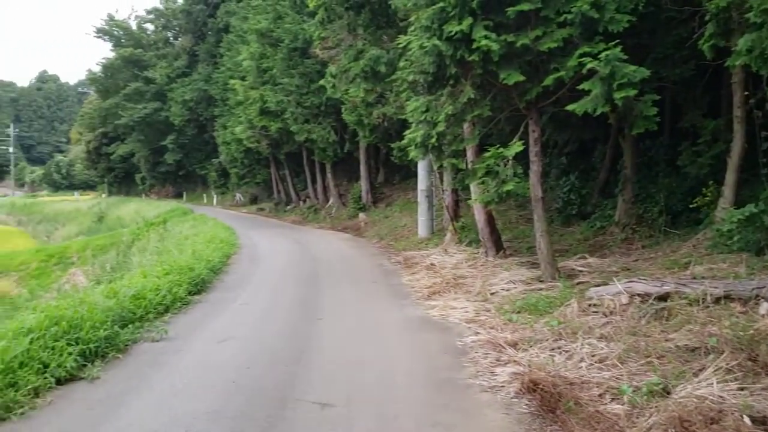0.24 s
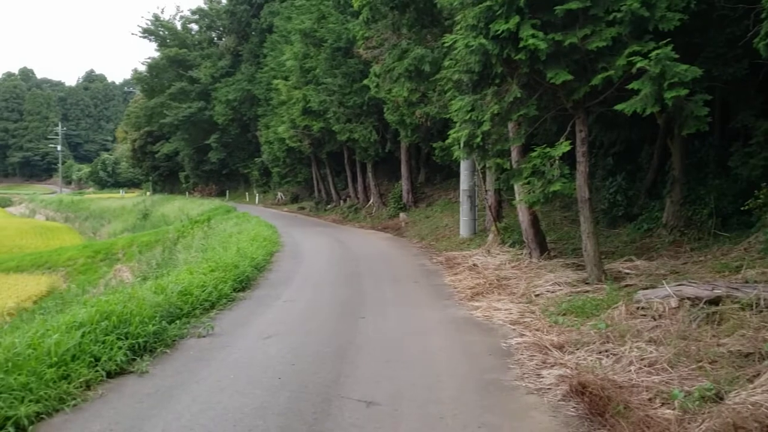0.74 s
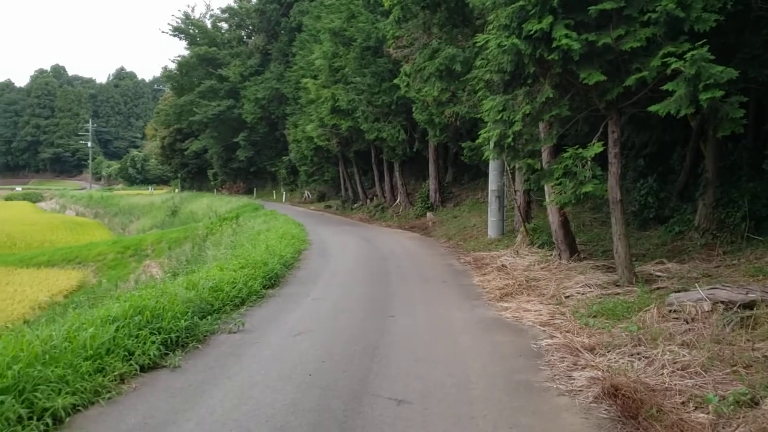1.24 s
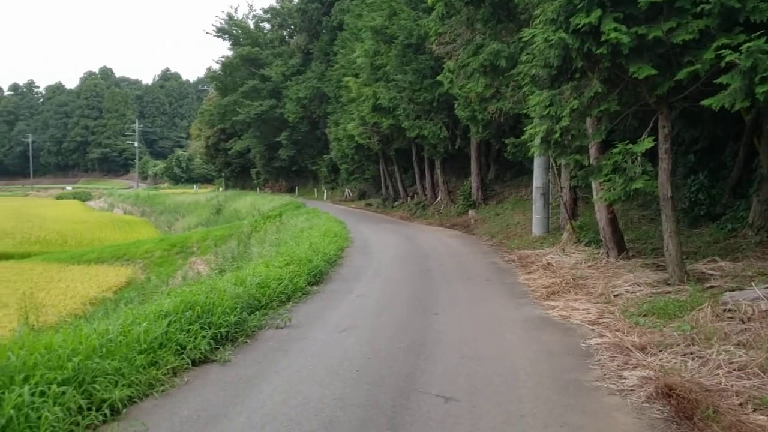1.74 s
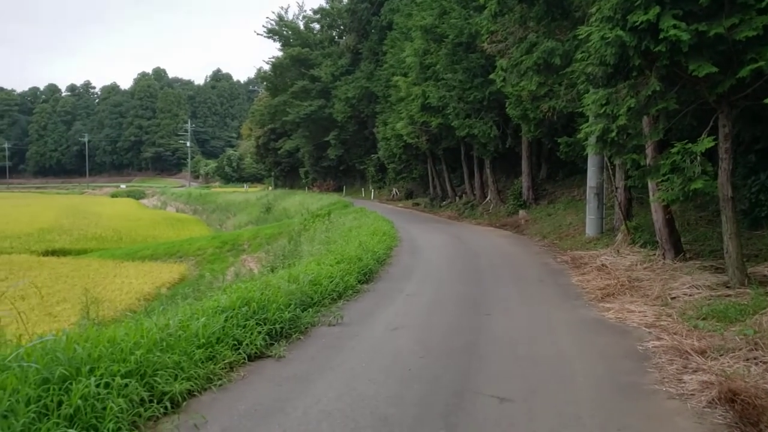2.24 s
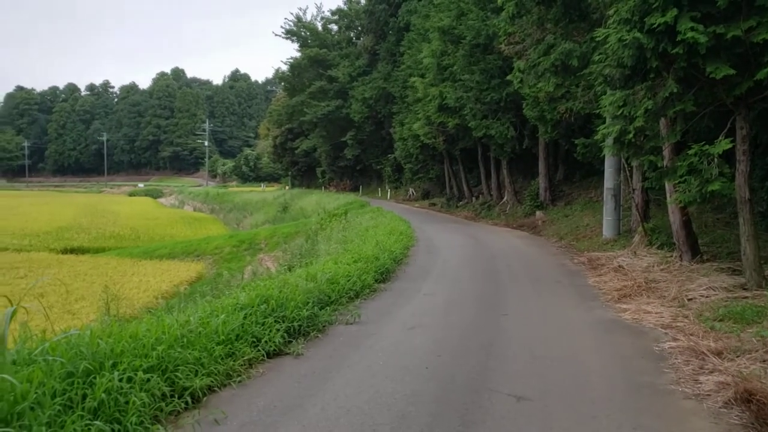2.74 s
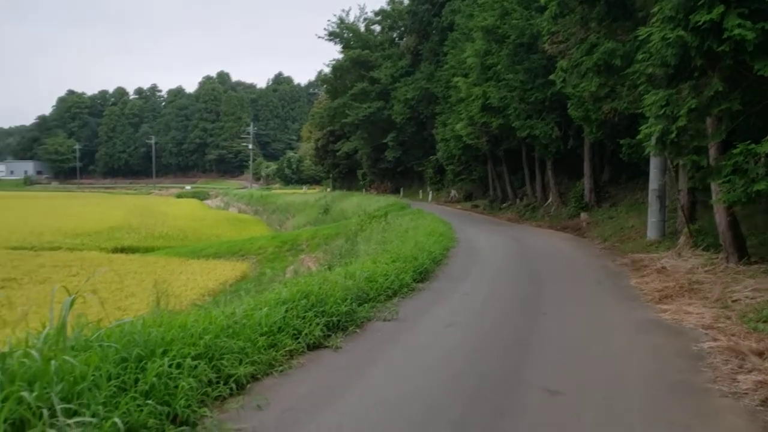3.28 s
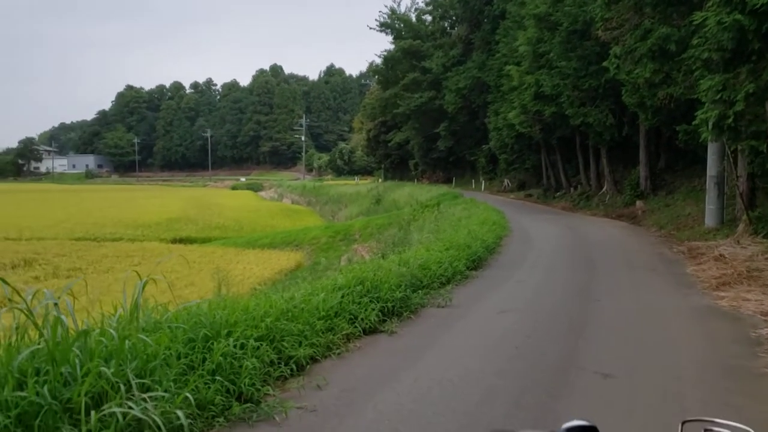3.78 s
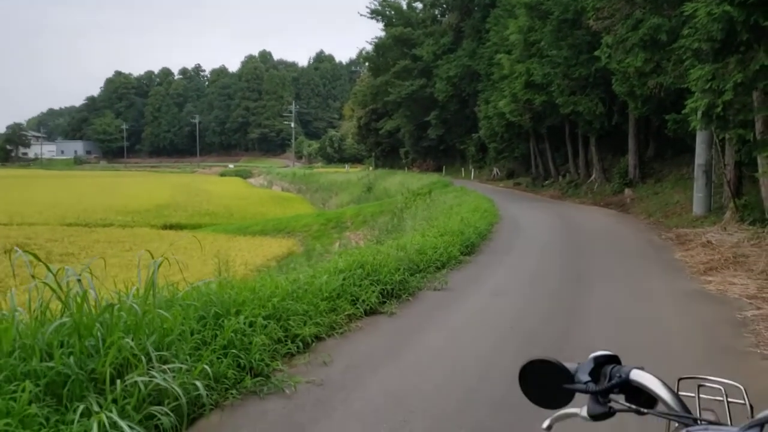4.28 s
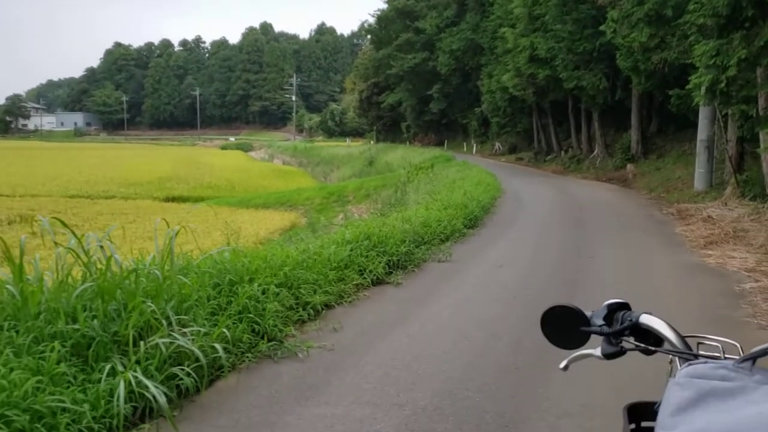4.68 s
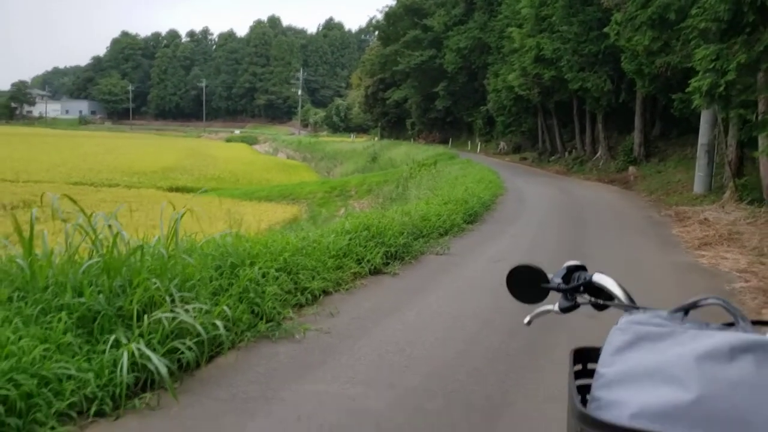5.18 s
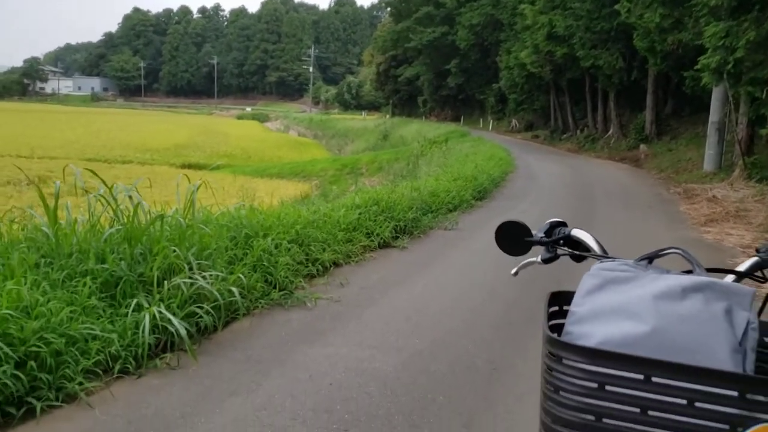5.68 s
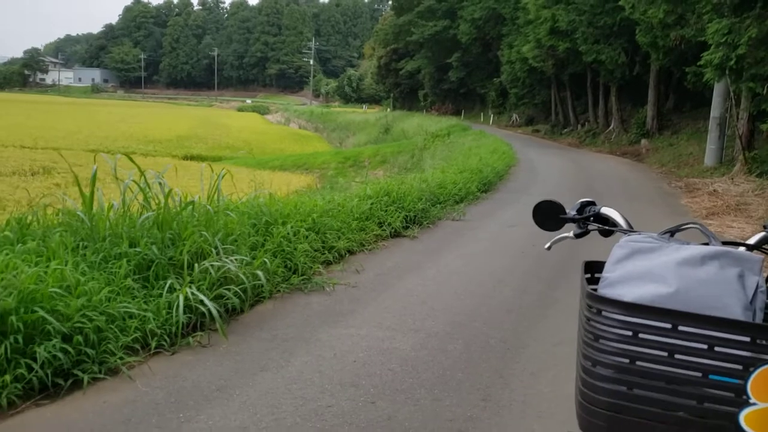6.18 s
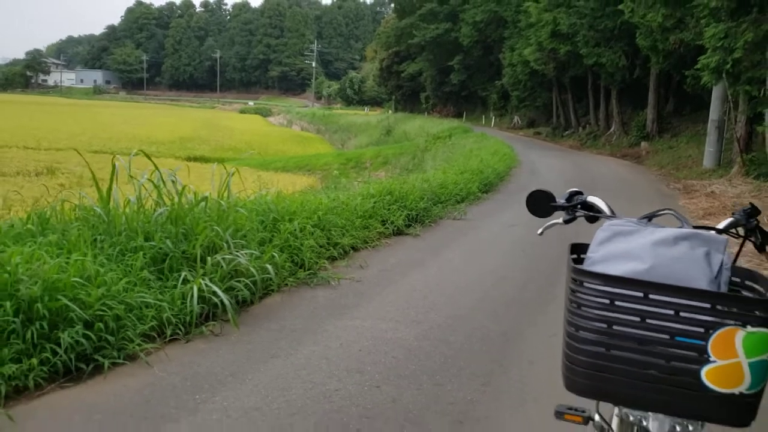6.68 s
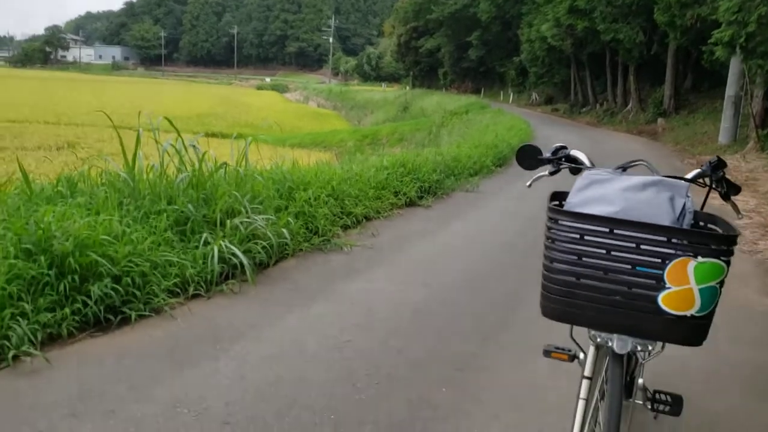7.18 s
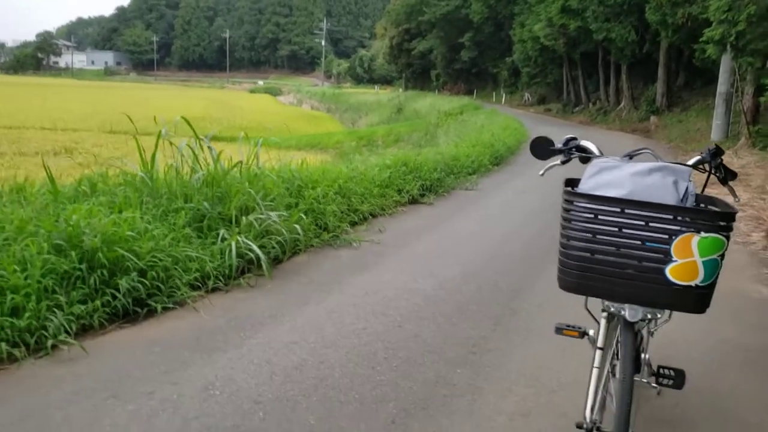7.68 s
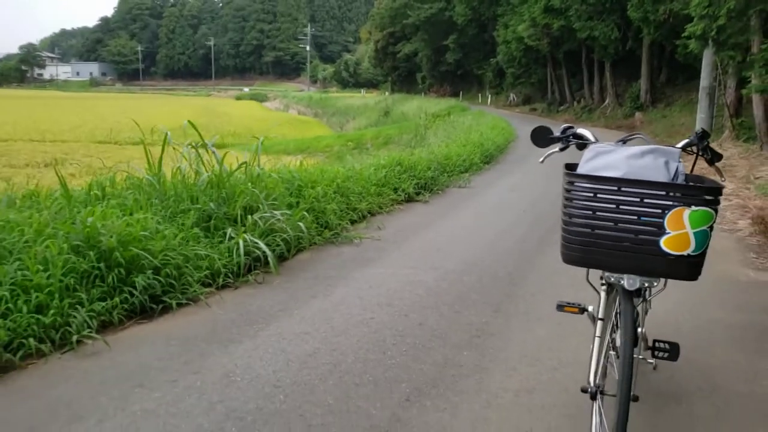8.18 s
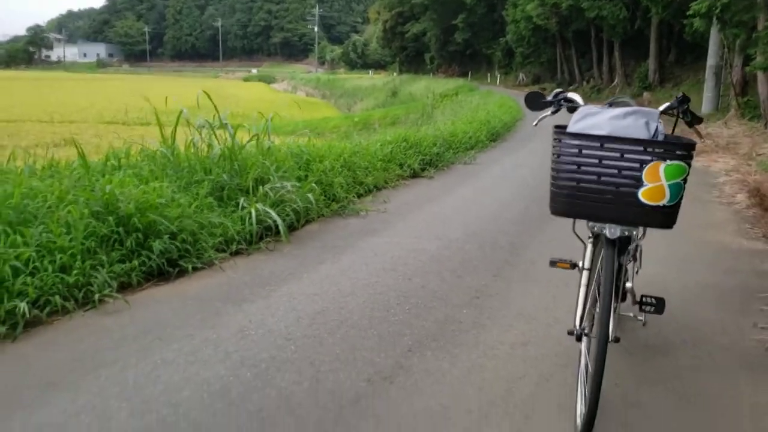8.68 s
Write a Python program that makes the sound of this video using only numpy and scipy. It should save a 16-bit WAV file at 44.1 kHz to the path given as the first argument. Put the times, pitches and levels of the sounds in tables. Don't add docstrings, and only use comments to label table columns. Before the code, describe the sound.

A handheld stereo phone hears a lane beside an echoing wood. Steady insect hiss and a soft, far cicada chorus run throughout; the chorus swells around 1.6 s, sinks near 5.7 and returns by 6.7. An early cicada pulses from 0 to 1.3 s. At 0.9 a near one starts, rapid ringing notes with sharp attacks, about eight or nine a second, rising in pitch, then sagging and slowing until 7.5. At 5.7 a second singer warms up and bursts in loudest from 6.1, joined by a third at 6.6 and fourth at 6.8, overlapping to the end at 8.9. Low wind rumble rises after 0.5, strengthens at 6, lulls, then gusts from 8 with hard flapping puffs mainly on the left. Dull handling knocks dot the whole, strongest near 2.8. Footsteps scuff and crunch grit from 2.5, with a sharp one at 7.5.

```python
import sys
import numpy as np
from scipy import signal
from scipy.fft import rfft, irfft, next_fast_len
from scipy.io import wavfile
from scipy.ndimage import uniform_filter1d

SR = 44100
rng = np.random.default_rng(int(sys.argv[2]) if len(sys.argv) > 2 else 0)


def decibels_to_gain(level_db):
    exponent = np.asarray(level_db, float) / 20
    return 10 ** exponent


def transcribe(signal):
    frames = np.atleast_2d(signal).T
    limited = np.clip(frames, -1, 1)
    pcm = np.round(limited * 32767).astype(np.int16)
    wavfile.write(sys.argv[1], SR, pcm)


N = 393813
TIME = np.arange(N) / SR
RIBS = 14
STEPS = 2 ** 14
WOOD_T60_S = .5


def unit(x):
    return x / np.sqrt(np.mean(x ** 2))


def curves(rows):
    s, *columns = np.transpose(rows)
    return [np.interp(TIME, s, column) for column in columns]


def colour(x, points):
    size = next_fast_len(N)
    hz = np.maximum(np.arange(size // 2 + 1) * SR / size, 1)
    points_hz, points_db = np.array(points).T
    gain = decibels_to_gain(np.interp(np.log(hz), np.log(points_hz), points_db))
    return irfft(rfft(x, size) * gain, size)[..., :N]


def walk(rate, channels=1):
    k = int(SR / rate)
    held = np.repeat(rng.standard_normal((channels, N // k + 1)), k, axis=1)
    smooth = uniform_filter1d(uniform_filter1d(held, k), k)
    return 1.3 * smooth[:, :N]


def add(out, s, sound):
    i = max(int(s * SR), 0)
    out[:, i:i + sound.shape[1]] += sound[:, :N - i]


def wood(x, t60):
    t = np.arange(int(SR * t60)) / SR
    tail = rng.standard_normal((2, len(t))) * decibels_to_gain(-60 * t / t60) * np.minimum(t / 0.012, 1)
    tail /= np.sqrt(np.sum(tail ** 2, axis=1, keepdims=True))
    echo = signal.fftconvolve(x, tail, axes=1)[:, :N]
    return colour(echo, [(2000, -3.5), (12000, -4)])


def hiss():
    # (f/Hz, level per Hz/dB)
    hiss_colour = [(150, 0), (330, -10.5), (500, -16.5), (1400, -19), (2100, -3.5), (2700, -11.5),
                   (3550, -11.5), (3900, -2), (5500, 3), (7500, -7.5), (9000, -19), (10000, -14),
                   (12500, -6.5), (15700, -7.5)]
    # (t/s, level/dB)
    rustle = [(0.0, -1), (0.4, -4), (1.1, 1.5), (1.4, -1.5), (2.4, -2.5), (2.75, 3), (3.2, -2), (3.6, 0.5),
              (4.6, 0), (5.2, -1), (5.6, 0.5), (6.5, -0.5), (6.9, -2.5), (8.93, 0.5)]
    noise = rng.standard_normal((3, N))
    shared = colour(np.array([np.roll(noise[2], 5), noise[2]]), [(600, -0.5), (1500, -2)])
    air = shared + colour(noise[:2], [(600, -1.7), (1500, 1.7)])
    leaves = colour(air, [(3500, 1), (3900, -61)])
    rustle_gain = decibels_to_gain(curves(rustle)[0] + 0.92 * walk(10))
    mixed = air + leaves * (rustle_gain - 1)
    return unit(colour(mixed, [(60, -38)] + hiss_colour)) * decibels_to_gain([[.9], [-.9]])


def drum_cycle(tones_db, slack_db, scatter_db):
    below_db = [-30.5, -16.5, -11, -7.5, -11, -9]
    above_db = [-51.5, -20, -18.5, -20, -22, -18]
    uneven_db = -19
    lines = np.zeros((len(tones_db), STEPS // 2 + 1), complex)
    for k, db in enumerate(tones_db):
        below, above = below_db[k] + slack_db, above_db[k] + slack_db
        around = np.array([below - 16, below - 12, below, uneven_db, 0,
                           uneven_db, above, above - 9, above - 11])
        size = decibels_to_gain(db + around + scatter_db * rng.standard_normal(len(around)))
        middle = RIBS * (k + 1)
        lines[k, middle - 4:middle + 5] = size * np.exp(2j * np.pi * rng.random(9))
    return irfft(lines, STEPS) * STEPS / np.sqrt(2)


def far_chorus(count, middle_hz, spread_hz, direct_db):
    far_tones_db = [0, 3, -5, -8, -14, -22]
    out = np.zeros((2, N))
    for place, tempo, start in rng.random((count, 3)):
        wander = 1 + .011 * walk(.8)[0] + 0.002964 * walk(120)[0]
        hz = (middle_hz + spread_hz * (place - .5)) * wander
        step = (np.cumsum(hz) / SR / RIBS % 1 * STEPS).astype(int)
        beat = ((7.5 + 2.5 * tempo) * TIME + start) % 1
        gate = np.clip(beat / 0.013, 0, 1) * np.clip((.45 - beat) / 0.058, 0, 1)
        gate *= decibels_to_gain(3.76 * walk(0.68)[0])
        for side in out:
            side += drum_cycle(far_tones_db, slack_db=8.5, scatter_db=0.5).sum(axis=0)[step] * gate
    return unit(decibels_to_gain(direct_db) * out + wood(out, 1.8 * WOOD_T60_S))


def wind():
    # (t/s, level/dB, left minus right/dB)
    breeze = [
        (0.0, -67, -6),
        (0.45, -60.5, -0.5),
        (2.1, -61.5, -6.5),
        (2.75, -59.5, -9),
        (3.0, -62, -6),
        (5.0, -60.5, -3.5),
        (6.0, -56.5, -1),
        (7.8, -62, -8.5),
        (7.95, -53.5, 3.5),
        (8.93, -52.5, 6),
    ]
    # (f/Hz, level per Hz/dB)
    rumble = [(12, -22), (20, -25), (47, 4), (66, 1.5), (113, -7.5), (211, -27.5), (300, -28.5), (390, -45),
              (660, -120)]
    # (t/s, peak level/dB, left minus right/dB, length/s)
    puffs = [(2.191, -49, -22, 0.016), (2.354, -46, -11, 0.029), (2.775, -47, -14, 0.035),
             (7.989, -44.5, 21.5, 0.053), (8.064, -39.5, 18, 0.018), (8.122, -42.5, 13.5, 0.018),
             (8.25, -37.5, 14, 0.055), (8.347, -43, 19.5, 0.036), (8.405, -37, 25, 0.0143),
             (8.447, -49, 15, 0.024), (8.653, -42, 20, 0.031), (8.686, -41.5, 27, 0.023),
             (8.734, -49.5, -18, 0.034), (8.815, -47, 10, 0.028), (8.881, -41, 10, 0.031)]
    db, pan_db = curves(breeze)
    eddies = unit(colour(rng.standard_normal((2, N)) * decibels_to_gain(1.17 * walk(14, channels=2)), rumble))
    out = eddies * decibels_to_gain(db + 7.0 + np.array([pan_db, -pan_db]) / 2)
    for (s, peak_db, pan_db, length), (pitch, left, right) in zip(puffs, rng.random((len(puffs), 3))):
        t = np.arange(int(length * SR)) / SR
        turns = (55 + 40 * pitch) * t + np.array([[left], [right]])
        shove = np.sin(2 * np.pi * turns) * np.hanning(len(t))
        add(out, s, shove * decibels_to_gain(peak_db + 7.5 + np.array([[pan_db], [-pan_db]]) / 2))
    return out


def notes_of(song, heard, fourth_db, slack_db):
    times, gap_ms, hz = np.transpose(song)
    starts = [times[0]]
    while starts[-1] < times[-1]:
        starts.append(starts[-1] + np.interp(starts[-1], times, gap_ms) / 1000)
    s = np.array(starts[:-1])
    at, db, upper_db = np.transpose(heard)
    db, upper_db = np.interp(s, at, db), np.interp(s, at, upper_db)
    cold_db = 3.4 * slack_db * (s < times[np.argmax(hz)])
    tones = np.transpose([db, db + upper_db, db + fourth_db + upper_db - cold_db])
    tones = tones + 0.16 * rng.standard_normal(tones.shape)
    return np.column_stack([s, np.interp(s, times, hz), tones])


def singer(song, heard, voice, place):
    swell_db = [
        [3],
        [6.5],
        [-1],
        [-4],
        [-4],
        [-4],
    ]
    release_s = [
        [.004],
        [.0035],
        [.008],
        [.007],
        [.007],
        [.007],
    ]
    first_note_shorter, notes_grow_s = .75, .27
    out = np.zeros((2, N))
    length, first_db, fourth_db, fifth_db, slack_db = voice
    lag, drift, low_pan_db, high_pan_db, echo_db = place
    notes = notes_of(song, heard, fourth_db, slack_db)
    t = np.arange(int((length + 0.046) * SR)) / SR
    lasts = length * np.array([[1], [1], [.68], [.68], [.68], [.8]])
    rise = .004 * (t / length - .5)
    full = np.argmax(notes[:, 1])
    first_s, first_hz = notes[0][:2]
    for k, (s, hz, second, third, fourth) in enumerate(notes):
        fourth = fourth + 3.0
        tones = [second + first_db, second, third, fourth, fourth + fifth_db, fourth + fifth_db - 9]
        warming = (notes[full][1] - hz) / max(notes[full][1] - first_hz, 1) * (k < full)
        cycle = drum_cycle(tones, slack_db * warming, scatter_db=0.66)
        held = lasts * (1 - first_note_shorter * np.exp((first_s - s) / notes_grow_s) * (full > 0))
        shape = np.minimum(t / 0.0025, 1) * np.exp(-np.maximum(t - held, 0) / release_s)
        shape *= decibels_to_gain(swell_db * (np.minimum(t / held, 1) - 0.9569))
        unsteady = np.interp(t, np.linspace(0, t[-1], 24), rng.standard_normal(24))
        turns = np.cumsum(hz * (1 + rise + 0.0048 * unsteady)) / SR / RIBS
        lag_now = lag + drift * (s - first_s) + .6 * rng.standard_normal((len(tones), 1))
        late = lag_now * hz / SR / RIBS
        pan_db = np.linspace(low_pan_db, high_pan_db, len(tones)) + 3.7 * rng.standard_normal(len(tones))
        lean = decibels_to_gain(pan_db / 2)
        left_step = ((turns - late) * STEPS).astype(int) % STEPS
        right_step = (turns * STEPS).astype(int) % STEPS
        left = cycle[np.arange(len(tones))[:, None], left_step] * shape
        right = cycle[:, right_step] * shape
        both = np.sqrt((lean ** 2 + lean ** -2) / 2)
        waver = decibels_to_gain(1.1 * np.interp(t, np.linspace(0, t[-1], 9), rng.standard_normal(9)))
        add(out, s, np.array([lean / both @ left, 1 / (lean * both) @ right]) * waver)
    return out + decibels_to_gain(echo_db) * wood(out, WOOD_T60_S)


def knocks():
    # (t/s, peak level/dB, f/Hz, left minus right/dB)
    pushes = [(0.565, -59.5, 171, -22), (1.156, -57, 156, -24), (1.938, -64, 310, 0),
              (2.489, -63, 170, -19), (2.5, -68, 900, 0), (2.731, -46.5, 297, -3), (2.78, -53, 169, 5),
              (2.841, -45, 257, -3), (3.442, -57.5, 330, -2.5), (3.471, -60, 350, -0.5),
              (4.016, -55.5, 300, -3.5), (4.178, -57, 179, -23.5), (4.398, -62, 196, -19),
              (4.677, -58, 181, -2.0), (4.874, -50.5, 172, -4), (5.34, -58.5, 330, -3.5),
              (5.768, -56, 175, -3), (6.001, -52, 318, -2.0), (6.641, -55.5, 218, 0),
              (6.715, -53.5, 180, 0.0), (7.105, -52, 164, -16), (7.495, -57.5, 285, -3.5),
              (7.763, -59, 230, -23), (8.078, -52, 163, 26), (8.32, -48, 167, 0), (8.598, -62, 172, -13),
              (8.882, -51.5, 194, 9)]
    out, t = np.zeros((2, N)), np.arange(3000) / SR
    for s, db, hz, pan_db in pushes:
        ring = np.sin(2 * np.pi * hz * t) * np.exp(-t * hz / 1.53) * np.minimum(t / 0.0016, 1)
        add(out, s, ring * decibels_to_gain(db + 6.5 + np.array([[pan_db], [-pan_db]]) / 2))
    return out


def scuffs():
    # (t/s, peak level/dB, length/s, treble of the crunch/dB)
    steps = [(2.51, -59, 0.075, -1), (2.793, -59, 0.15, -2), (3.3, -54.5, 0.11, -10),
             (3.406, -61, 0.092, -5), (3.734, -67, 0.17, 8), (3.847, -53, 0.056, 4), (4.437, -56, 0.11, -1),
             (4.874, -50.5, 0.026, -6), (5.357, -57.5, 0.078, 0), (5.771, -50, 0.037, 3),
             (6.715, -53, 0.04, 0), (7.098, -57, 0.057, 0), (7.514, -45, 0.064, 3), (7.841, -51, 0.006, 7),
             (7.85, -53, 0.03, -8), (8.212, -56.5, 0.057, 4.5), (8.303, -56, 0.088, 4),
             (8.596, -50, 0.0043, 7), (8.781, -47.5, 0.065, -3.5)]
    # (f/Hz, level per Hz/dB)
    grit_colour = [(400, -10), (900, -0.5), (1500, -0.5), (3000, -1.5), (8000, 3), (15000, -22.5)]
    gate = np.zeros((2, N))
    for s, db, length, treble_db in steps:
        t = np.arange(int(4 * length * SR)) / SR / length
        swell = np.minimum(t / 0.69, 1) * np.exp(-t ** 2)
        add(gate, s - 0.29 * length, decibels_to_gain([[db], [db + treble_db]]) * swell)
    grains = rng.standard_normal((3, N)) * decibels_to_gain(3.1 * rng.exponential(size=(3, N)))
    shared = np.array([np.roll(grains[0], 4), grains[0]])
    grit = unit(colour(shared + 1.3 * grains[1:], grit_colour))
    thud = colour(grit, [(1500, 1), (2500, -46)])
    crunch = grit - thud
    return (thud * gate[0] + crunch * gate[1]) * decibels_to_gain(2.8 + 3.9 * walk(80))


def scene():
    # (t/s, chorus level/dB, hiss level/dB)
    far_levels = [
        (0.0, -59.5, -63.5),
        (1.59, -56, -62),
        (5.67, -64.5, -61.5),
        (6.69, -55, -58.5),
        (8.55, -58, -59),
        (8.93, -59, -56.5),
    ]
    # (t/s, gap to the next note/ms, rib rate/Hz)
    first_song = [(0.939, 110, 2053), (1.268, 110, 2117), (1.604, 113.6, 2138), (1.948, 119.2, 2122),
                  (2.666, 118.9, 2098), (3.023, 121.2, 2095), (3.505, 120.4, 2089), (4.486, 125.5, 2077),
                  (5.26, 134.4, 2063), (5.819, 147.5, 2049), (6.122, 165, 2037), (6.677, 227, 2024),
                  (7.47, 331, 2010)]
    second_song = [(5.701, 115.8, 2063), (5.819, 108.9, 2092), (6.033, 104.2, 2180), (6.239, 102.8, 2193),
                   (6.447, 110, 2186), (6.784, 115.3, 2167), (7.364, 119, 2156), (8.314, 118.6, 2142),
                   (8.82, 122.7, 2141)]
    third_song = [(6.596, 94.8, 2223), (6.794, 113, 2238), (7.146, 123.2, 2219), (8.006, 123.3, 2202),
                  (8.9, 125.9, 2198)]
    fourth_song = [(6.779, 124.7, 2209), (7.29, 129.1, 2174), (7.536, 123.5, 2175), (7.79, 128, 2166),
                   (8.82, 127.6, 2163)]
    early_song = [(0.006, 116.5, 2177), (0.23, 113.6, 2155), (1.074, 123.6, 2142), (1.31, 104.7, 2147)]
    # (t/s, level/dB, lift of the
    # tones from the 3rd up/dB)
    first_heard = [(0.94, -46, -18), (1.27, -42, -12), (1.95, -42.5, -12), (2.67, -47.5, -6.5),
                   (3.02, -51, -3.5), (3.5, -53.5, 0), (4.49, -52.5, -2), (5.26, -60, 2.5), (5.97, -58, 5),
                   (6.47, -58, 2), (7.45, -57, 0)]
    second_heard = [(5.7, -45.5, -14), (6.03, -37.5, -8), (6.14, -33.5, -8), (6.45, -33.5, -8.5),
                    (6.78, -39, -1), (7.36, -35, -5.5), (8.31, -48.5, 5.5), (8.8, -51, 4)]
    third_heard = [(6.6, -39.5, -7), (6.79, -45.5, -5.5), (7.15, -49, -14), (8.0, -49.5, -6),
                   (8.75, -49.5, -6.5)]
    fourth_heard = [(6.79, -55, -8), (7.29, -47, -12), (7.54, -47.5, -11.5), (7.79, -41.5, -19.5),
                    (8.8, -43.5, -27)]
    early_heard = [(0.0, -52.5, -3.5), (0.23, -51, -8), (1.07, -49.5, -5.5), (1.29, -56.5, 0)]
    # (note length/s, 1st tone over 2nd/dB, 4th over 2nd/dB, 5th over 4th/dB,
    # slackness while warming up/dB)
    voices = [
        (0.043, -7, 2, -9, -0.5),
        (0.046, -18, -12, -11, 12),
        (0.039, -10.5, -3.5, -7.5, 1.5),
        (0.043, -37, 4, -3.5, 3),
        (0.041, -7.5, -6.5, -7.5, 0),
    ]
    # (left lag/samples, lag drift/samples per s, left minus right at the lowest tone/dB,
    # the same at the highest tone/dB, echo/dB)
    places = [
        (-1, -0.096, 7, -11, -5),
        (12, -0.12, 1.7, 8.5, -6.5),
        (2, -0.11, 1.7, -3, 4),
        (13.5, -0.054, 1.9, 3.5, -9),
        (11.5, 0, 25, -23, 1),
    ]
    chorus_db, hiss_db = curves(far_levels)
    songs = [first_song, second_song, third_song, fourth_song, early_song]
    heard = [first_heard, second_heard, third_heard, fourth_heard, early_heard]
    insects = decibels_to_gain(hiss_db + 9.0) * hiss()
    far = decibels_to_gain(chorus_db + 10.0) * far_chorus(count=18, middle_hz=2137.0, spread_hz=150, direct_db=2.5)
    near = decibels_to_gain(2.0) * sum(singer(*row) for row in zip(songs, heard, voices, places))
    return insects + far + wind() + near + knocks() + scuffs()


def low_pass(x):
    return signal.sosfilt(signal.butter(12, 15740, fs=SR, output="sos"), x)


def record(dry):
    # (f/Hz, gain/dB)
    port = [(8700, 0.5), (9300, -2), (9900, 3), (10400, 2), (15700, -4.5), (15900, -60)]
    mix = colour(dry, port)
    return low_pass(mix)


dry = scene()
out = record(dry)
transcribe(out)
```